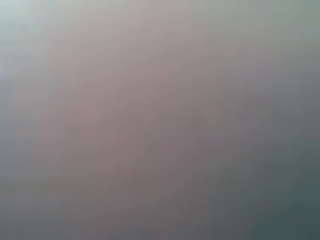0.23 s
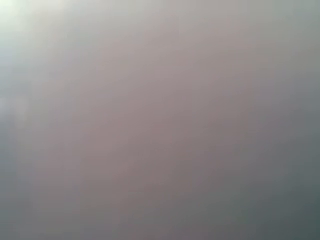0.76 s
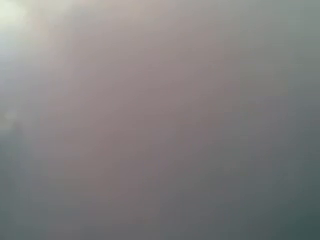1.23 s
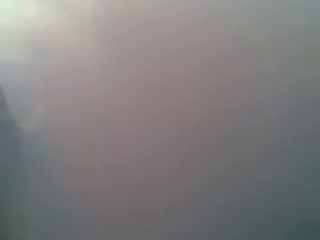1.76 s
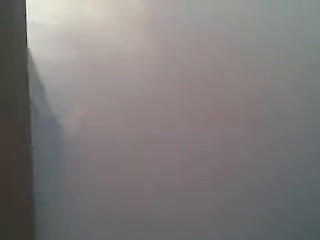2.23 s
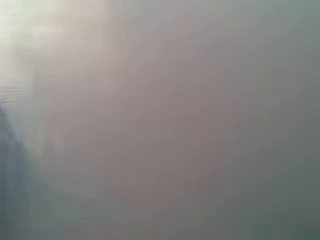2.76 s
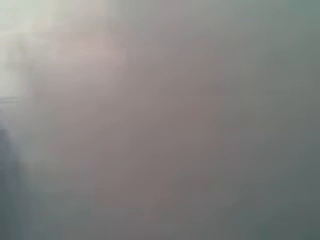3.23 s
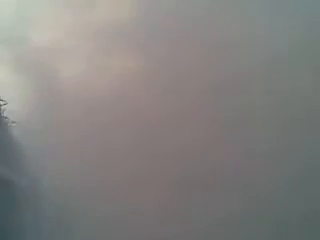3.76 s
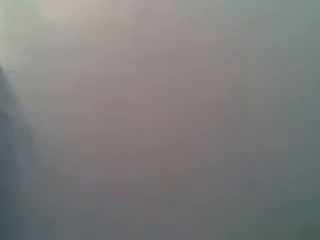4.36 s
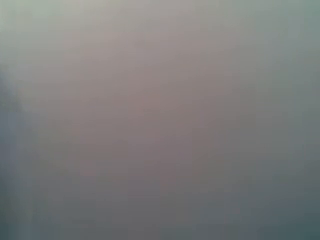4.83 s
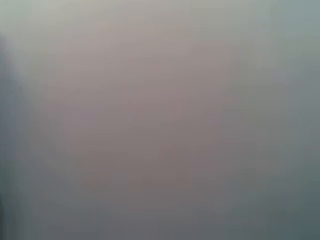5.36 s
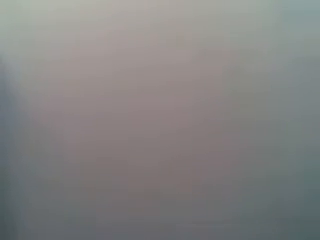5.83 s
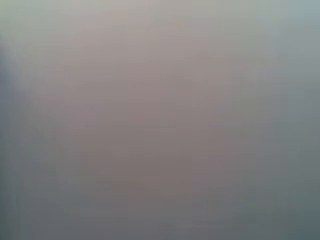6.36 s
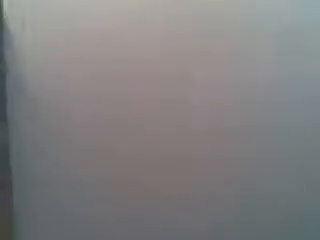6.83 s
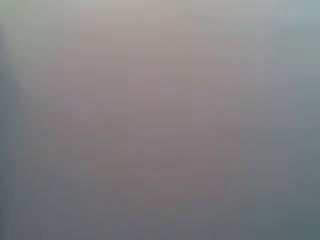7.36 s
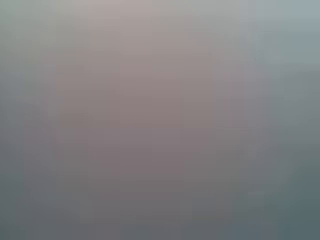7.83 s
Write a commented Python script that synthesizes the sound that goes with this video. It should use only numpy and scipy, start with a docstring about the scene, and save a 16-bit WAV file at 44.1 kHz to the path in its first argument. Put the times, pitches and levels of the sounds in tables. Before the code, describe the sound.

Rapid, irregular firecracker bangs close by outdoors, each a harsh clipped crack and rasp falling to a thud, with short slaps and a dull street echo.

```python
"""A street between houses, a few steps from a long string of firecrackers, heard through a small camera.
Each bang is a noise crack, a slap off the house fronts and a dying echo, riding on a surge of blast pressure.
The surge folds the microphone into full-scale swings that slow as it drains, and the camera overloads:
each bang becomes a flat-topped rasp ending in a falling chirp and a soft thud.
Steady noise lies beneath; faint dull pops fall in the pauses."""
import sys
import numpy as np
from scipy import signal
from scipy.fft import rfft, irfft
from scipy.io import wavfile

SR = 44100
rng = np.random.default_rng(int(sys.argv[2]) if len(sys.argv) > 2 else 0)


def dump(signal):
    """Clip the signal to [-1, 1] and save it as 16-bit WAV at the path in sys.argv[1]."""
    limited = np.clip(np.atleast_2d(signal).T, -1, 1)
    pcm = np.round(limited * 32767).astype(np.int16)
    wavfile.write(sys.argv[1], SR, pcm)


N = 356769
TIME_S = np.arange(N) / SR

# steady street background, noise spectrum: f/Hz, density/(dB per Hz)
BACKGROUND_SPECTRUM = [(18, -58), (30, -26), (92, 5), (346, -46), (384, -17), (460, 12), (1060, 21),
                       (3590, 12), (7630, -41), (15000, -72)]
# far echo, noise spectrum: f/Hz, density/(dB per Hz)
FAR_SPECTRUM = [(25, -17), (60, 2), (170, 6), (350, 7.5), (1400, 2.5), (2000, -4), (3000, -10.5),
                (4500, -6.5), (7000, -7.5), (9000, -16.5), (15000, -27)]
# faint pops in the pauses: t/s, level/dB
FAINT_POPS = [(2.755, -36), (2.804, -25.5), (6.656, -38)]
# firecrackers, one row each: t/s, level/dB, pressure surge length/s
CRACKERS = [(0.0, -4.5, 0.033), (0.032, 12.0, 0.038), (0.2188, 11.0, 0.1), (0.3454, 14, 0.081),
            (0.439, 6.5, 0.062), (0.502, 8.5, 0.082), (0.535, 15.5, 0.081), (0.6667, 11.5, 0.095),
            (0.8936, 3, 0.05), (1.0765, 10.5, 0.079), (1.194, 5, 0.049), (1.2495, 6.5, 0.069),
            (1.4462, 13.5, 0.13), (1.6797, 17, 0.088), (1.79, 14.5, 0.053), (1.925, 3.5, 0.037),
            (1.9619, 13.0, 0.1), (2.1926, 4.5, 0.031), (2.2266, 7.5, 0.018), (2.2407, 15.0, 0.054),
            (2.352, 7.5, 0.037), (2.4244, 3.5, 0.051), (2.494, 8.5, 0.097), (2.5844, 2.5, 0.05),
            (2.972, 24.5, 0.097), (3.088, 3.0, 0.103), (3.1301, 10.5, 0.072), (3.184, 15.0, 0.087),
            (3.3252, 4, 0.066), (3.3486, 13.5, 0.12), (3.4904, 12.5, 0.085), (3.6139, 9, 0.046),
            (3.6689, 3, 0.078), (3.6979, 20, 0.21), (3.7359, 10, 0.099), (3.8572, 10.5, 0.15),
            (3.89, 8, 0.056), (3.9622, 8, 0.045), (4.141, 9.5, 0.074), (4.1778, 15.5, 0.087),
            (4.2445, -0.5, 0.063), (4.4021, 10.0, 0.08), (4.5809, 5.5, 0.076), (4.6751, 13.5, 0.044),
            (4.7636, 11, 0.11), (4.801, 13.5, 0.057), (4.977, 14, 0.06), (5.0685, 9, 0.11),
            (5.1617, 3, 0.083), (5.191, 12, 0.027), (5.2724, 13.5, 0.084), (5.4281, 10, 0.066),
            (5.495, 13, 0.086), (5.5887, 4, 0.013), (5.6056, 9.5, 0.063), (5.6538, 6.0, 0.071),
            (5.8874, 2.5, 0.07), (5.9935, 4.0, 0.093), (6.0242, 11, 0.041), (6.068, 10.5, 0.05),
            (6.114, 3, 0.066), (6.1601, 15.0, 0.099), (6.2621, 1.5, 0.085), (6.3507, 0, 0.055),
            (6.7371, 7.5, 0.07), (6.787, 3, 0.08), (6.9505, 18, 0.074), (7.0342, 9.5, 0.11),
            (7.0686, 9, 0.096), (7.141, 8, 0.065), (7.2096, 13.0, 0.098), (7.2908, 9, 0.071),
            (7.3922, 11, 0.093), (7.438, 7.5, 0.062), (7.514, 16, 0.064), (7.5772, 20.5, 0.081),
            (7.624, 5, 0.092), (7.661, -1.5, 0.076), (7.737, 10.5, 0.073), (7.7787, 10, 0.088),
            (7.8625, 6.5, 0.071), (7.9224, 4.0, 0.059), (7.9553, 8.5, 0.12), (7.997, 10.5, 0.16)]
# crack and first reflections, noise spectrum: f/Hz, density/(dB per Hz)
CRACK_SPECTRUM = [(25, -16.5), (100, 4.5), (500, 2), (1800, 3), (3000, 0), (4500, -2), (7300, 0),
                  (9000, -6.5), (15000, -21.5)]
# later slap between the houses, noise spectrum: f/Hz, density/(dB per Hz)
SLAP_SPECTRUM = [(25, -52), (60, 3), (170, -4.5), (500, 4), (1000, 0.5), (1700, 2.5), (3000, -10.5),
                 (4200, -16), (7200, -27), (9000, -17), (15000, -27)]
# camera response after overload: f/Hz, gain/dB
CAMERA_RESPONSE = [(20, -2.5), (60, -1.5), (500, -2), (1000, -1.5), (1700, -1), (3000, -1.5), (7500, -1),
                   (10000, -5.5), (15500, -7.5)]

EDGE_HZ = 15900  # camera band limit
POP_T60_S = 0.27
USUAL_DB, USUAL_SURGE_S = 9, 0.07  # reference bang for the power laws below
# ring between the houses: usual T60, exponents on strength and surge length, factor in a volley
USUAL_RING_T60_S, RING_STRENGTH_EXP, RING_LENGTH_EXP, RING_VOLLEY_FACTOR = 0.18, -0.24, 0.7, 1.32
# surge drain: usual factor, exponents on strength and surge length, factor when surges pile up
USUAL_DRAIN, DRAIN_STRENGTH_EXP, DRAIN_LENGTH_EXP, DRAIN_VOLLEY_FACTOR = 0.67, 0.24, -0.37, 1.35


def gain_of(db):
    """Decibels to amplitude."""
    return 10 ** (np.asarray(db) / 20)


def evened(x):
    """Scales to rms 1."""
    return x / np.sqrt(np.mean(x ** 2) + 1e-20)


def coloured(x, points):
    """Minimum-phase filter with gain through (f/Hz, gain/dB) points, interpolated over log f."""
    size = 4096
    hz, db = np.transpose(points)
    bins_hz = abs(np.fft.fftfreq(size, 1 / SR))
    gain_db = np.interp(np.log(bins_hz + 1), np.log(hz), db)
    log_gain = np.log(gain_of(gain_db))
    # the Hilbert transform of log gain supplies the phase
    response = np.exp(np.conj(signal.hilbert(log_gain)))
    taps = np.fft.ifft(response).real
    return signal.oaconvolve(x, taps[:size // 2])[:N]


def noise(spectrum):
    """Noise of rms 1 with the given spectrum."""
    return evened(coloured(rng.standard_normal(N), spectrum))


def wander(hz):
    """Random low-passed signal of rms 1, falling off above about hz."""
    bins_hz = np.fft.rfftfreq(N, 1 / SR)
    lowpass = 1 / (1 + (bins_hz / hz) ** 4)
    return evened(irfft(rfft(rng.standard_normal(N)) * lowpass, N))


def span_and_age(start_s):
    """Sample span from an onset, at most half a second, and the time since onset in s."""
    start = int(np.clip(start_s * SR, 0, N - 1))
    age_s = TIME_S[:min(N - start, SR // 2)]
    return slice(start, start + len(age_s)), age_s


def street_background(level_db=-39):
    """Steady street noise at constant level."""
    return gain_of(level_db) * noise(BACKGROUND_SPECTRUM)


def far_echo(echo_db=-32.0, level_exp=0.97, t60_s=1.56, lumpy_db=0.26, lumps_hz=40):
    """Long dull street echo: each bang adds power, which decays exponentially."""
    kicks = np.zeros(N)
    for start_s, db, _ in CRACKERS:
        span, _ = span_and_age(start_s)
        kicks[span.start] += gain_of(level_exp * db + echo_db) ** 2
    keep = np.exp(-2 * np.log(1000) / (t60_s * SR))  # power kept per sample
    power = signal.lfilter([1], [1, -keep], kicks)
    lumps = gain_of(lumpy_db * wander(lumps_hz))
    return np.sqrt(power) * lumps * noise(FAR_SPECTRUM)


def faint_pops():
    """Small dull pops: exponentially decaying noise with the far echo's spectrum."""
    level = np.zeros(N)
    for start_s, db in FAINT_POPS:
        span, age_s = span_and_age(start_s)
        level[span] += gain_of(db - 60 * age_s / POP_T60_S)
    return level * noise(FAR_SPECTRUM)


def bangs():
    """Rows of t/s, level/dB, ring T60/s, surge length/s, drain factor, by power laws and volley."""
    start_s, db, length_s = np.transpose(CRACKERS)
    strength = gain_of(db - USUAL_DB)
    stretch = length_s / USUAL_SURGE_S
    # volley: the next cracker goes off before this surge has drained
    in_volley = np.append(start_s[1:], N / SR) < start_s + length_s
    t60_s = USUAL_RING_T60_S * strength ** RING_STRENGTH_EXP * stretch ** RING_LENGTH_EXP
    t60_s = t60_s * np.where(in_volley, RING_VOLLEY_FACTOR, 1)
    drain = USUAL_DRAIN * strength ** DRAIN_STRENGTH_EXP * stretch ** DRAIN_LENGTH_EXP
    drain = drain * np.where(in_volley, DRAIN_VOLLEY_FACTOR, 1)
    return np.transpose([start_s, db, t60_s, length_s, drain])


def cracks(crack_db=11, crack_s=0.0012, build_s=0.0056, bright_s=0.084,
           lumpy_db=2.5, lumps_hz=110, level_db=-1):
    """Direct crack, then lumpy reflections from ground and house fronts, duller with age."""
    bright_power, dull_power = np.zeros((2, N))
    lumps = gain_of(lumpy_db * wander(lumps_hz))
    for start_s, db, t60_s, _, _ in bangs():
        span, age_s = span_and_age(start_s)
        direct_power = gain_of(db + crack_db) ** 2 * np.exp(-age_s / crack_s)
        build = 1 - np.exp(-age_s / build_s)
        decay = np.exp(-np.log(1000) * age_s / t60_s)
        walls_power = (gain_of(db) * lumps[span] * build * decay) ** 2
        early = np.exp(-age_s / bright_s)
        bright_power[span] += direct_power + early * walls_power
        dull_power[span] += (1 - early) * walls_power
    bright = np.sqrt(bright_power) * noise(CRACK_SPECTRUM)
    dull = np.sqrt(dull_power) * noise(SLAP_SPECTRUM)
    return gain_of(level_db) * (bright + dull)


def surges(top_hz=2750, push=3.6, trickle=0.32, easing=1.45, sway_hz=100, jitter_hz=700,
           undershoot_rad=0.45, settle_s=0.0054):
    """Blast pressure as microphone phase/rad: drains in fits and starts, dips past zero, settles."""
    sway, jitter, shake = 0.55, 0.42, 0.25  # rms, relative
    pressure_rad = np.zeros(N)
    unsteady = 1 + sway * wander(sway_hz) + jitter * wander(jitter_hz)
    shaky = 1 + shake * wander(jitter_hz)
    chances = rng.random((len(CRACKERS), 2))
    for (start_s, _, _, length_s, drain), (side, depth) in zip(bangs(), chances):
        span, age_s = span_and_age(start_s)
        main_push = push * np.maximum(1 - age_s / length_s, 0) ** easing
        drive = main_push + trickle * (age_s < length_s)
        # the drain factor acts squared; the arctan levels off at top_hz, before the shake
        limited = 2 / np.pi * np.arctan(drain ** 2 * drive * unsteady[span])
        swings_hz = top_hz * limited * shaky[span]
        to_drain_rad = 2 * np.pi * np.cumsum(swings_hz[::-1])[::-1] / SR
        after = np.maximum(age_s - length_s, 0) / settle_s
        dip_rad = undershoot_rad * (0.5 + depth) * after * np.exp(1 - after)  # undershoot: mean peak
        # random polarity; a new blast replaces the last
        pressure_rad[span] = np.sign(side - 0.5) * (to_drain_rad - dip_rad)
    return pressure_rad


def folded(phase_rad, sharp=0.999, swing_db=5):
    """Overloaded microphone turns back at its limit: a steady fall of pressure becomes a tone."""
    # sharp: near 0 sine, near 1 triangle
    return gain_of(swing_db) * np.arcsin(sharp * np.sin(phase_rad)) / np.arcsin(sharp)


def clipped(x, ceiling_db=-3.5):
    """Camera overload: flattens everything over 1 with a round knee, then scales to the ceiling."""
    return gain_of(ceiling_db) * x / np.sqrt(np.hypot(1, x ** 2))


def scene():
    """Microphone output, one channel; the camera is full at 1."""
    background = street_background() + far_echo() + faint_pops()
    return (background + cracks() + folded(surges()))[None]


def record(dry):
    """Camera: overload, dull top, band limit."""
    wet = coloured(clipped(dry[0]), CAMERA_RESPONSE)
    edge = signal.firwin(511, EDGE_HZ, window=("kaiser", 9), fs=SR)
    return signal.oaconvolve(wet, edge, "same")[None]


dry = scene()
out = record(dry)
dump(out)
```